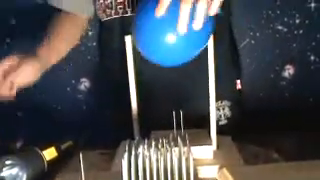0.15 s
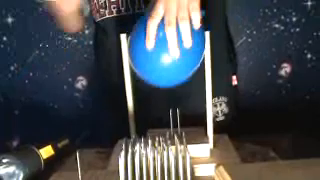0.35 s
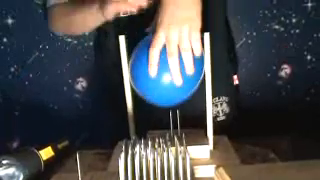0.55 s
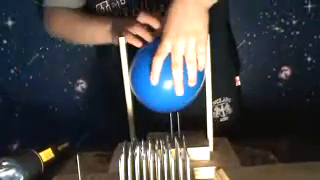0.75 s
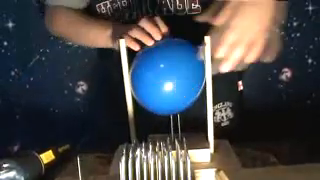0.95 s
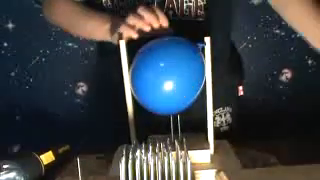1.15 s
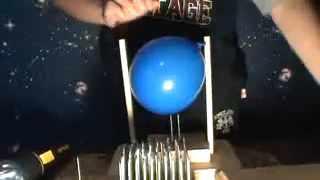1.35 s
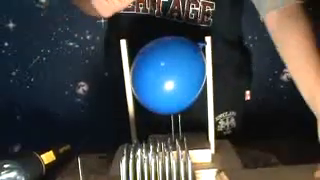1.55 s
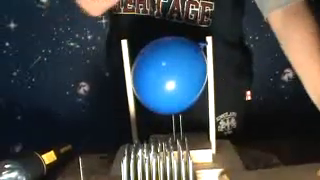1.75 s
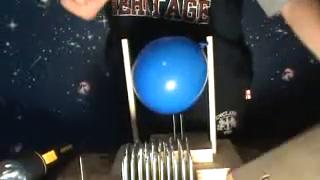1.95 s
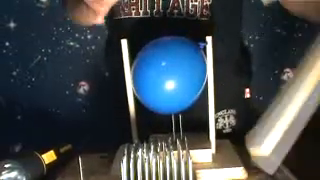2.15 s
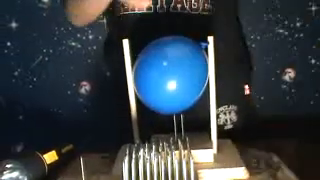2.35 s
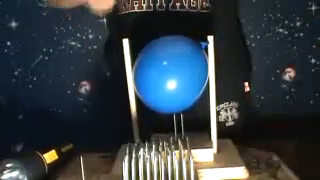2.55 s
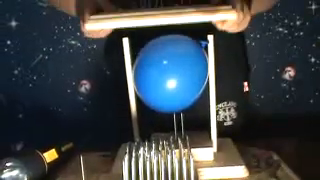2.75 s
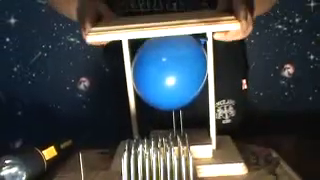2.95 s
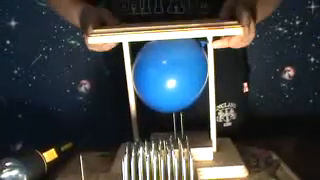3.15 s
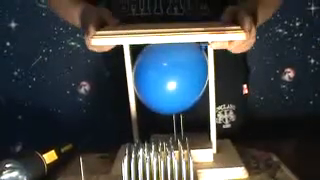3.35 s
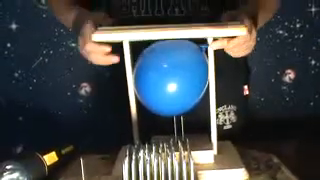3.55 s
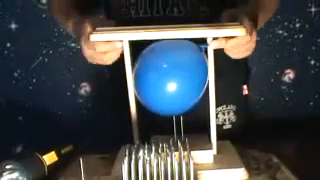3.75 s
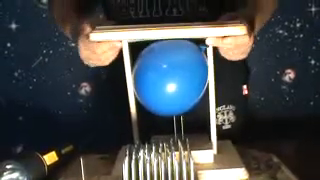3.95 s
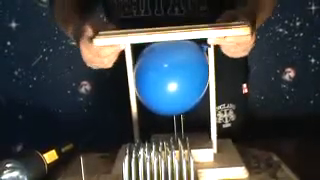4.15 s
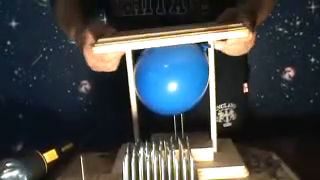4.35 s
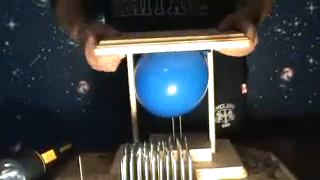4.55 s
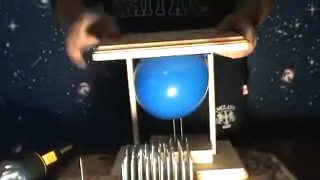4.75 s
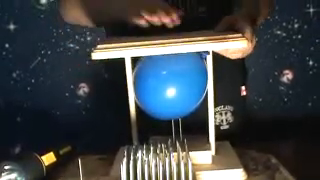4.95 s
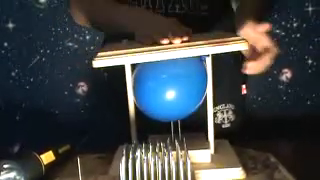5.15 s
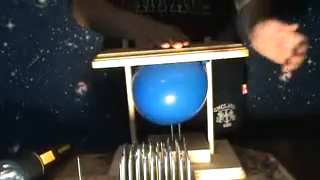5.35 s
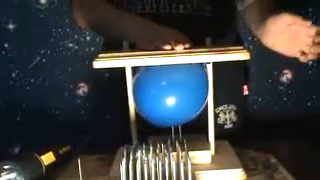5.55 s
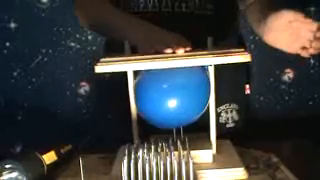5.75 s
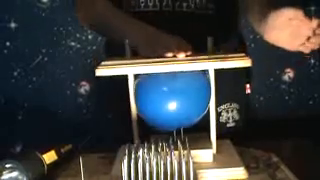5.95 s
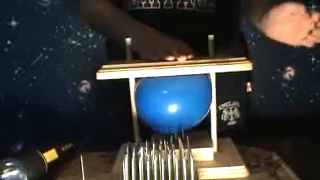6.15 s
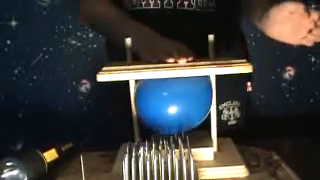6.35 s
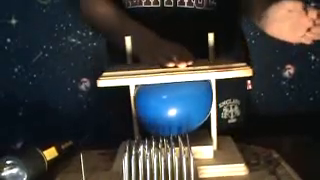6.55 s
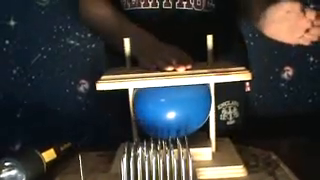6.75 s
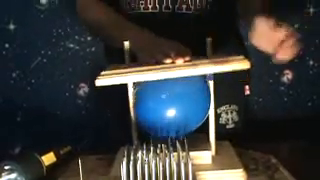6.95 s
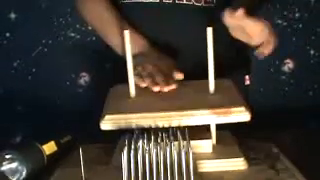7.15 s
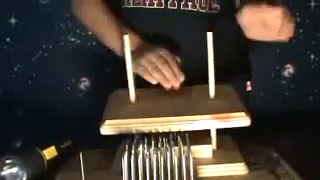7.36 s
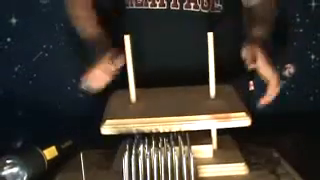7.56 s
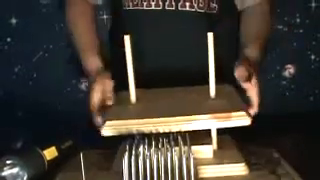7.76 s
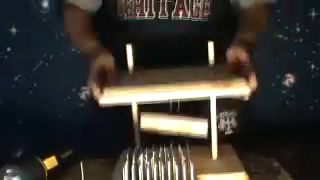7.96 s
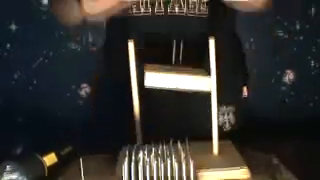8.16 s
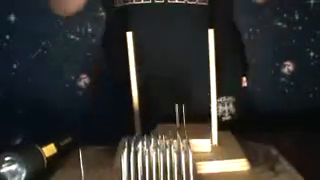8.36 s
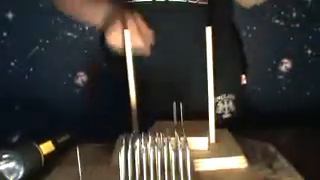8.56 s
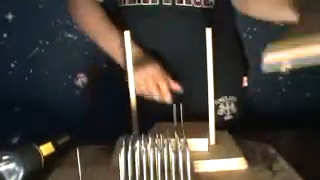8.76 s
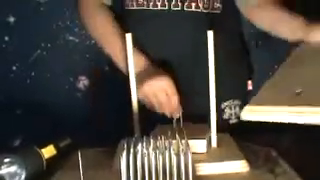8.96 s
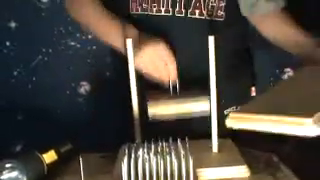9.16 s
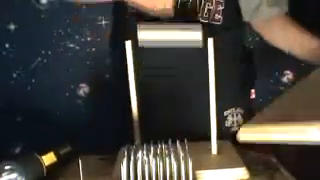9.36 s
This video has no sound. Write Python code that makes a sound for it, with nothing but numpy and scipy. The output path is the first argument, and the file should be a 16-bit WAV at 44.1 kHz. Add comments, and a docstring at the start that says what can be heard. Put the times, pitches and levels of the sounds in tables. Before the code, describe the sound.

Soft rubber rubbing and wooden knocks lead to a loud balloon pop, a heavy thud and a metallic clatter in a small room.

```python
"""In a small, echoing room, a balloon rubs and groans as it is wedged between wooden dowels above a
block of nails. The frame knocks; a board slides down the dowels and nudges the creaking rubber.
After a faint squeak, the board slips in jerks that make the balloon boom. At about 7 seconds the
balloon bursts and the board falls on the base. Lifting the board drags the nail block up until it
drops with a clatter, and two last knocks follow."""
import sys
import numpy as np
from scipy import signal
from scipy.fft import rfft, irfft, next_fast_len
from scipy.io import wavfile
from scipy.ndimage import uniform_filter1d

SR = 44100
rng = np.random.default_rng(int(sys.argv[2]) if len(sys.argv) > 2 else 0)


def digitize_waveform(pressure):
    """Quantize a signal to 16-bit integers and store it at the path in sys.argv[1].

    Rows of a 2-D input are taken as channels; values are limited to [-1, 1].
    """
    field = np.atleast_2d(pressure).T
    bounded = np.clip(field, -1, 1)
    quanta = np.round(bounded * 32767).astype(np.int16)
    wavfile.write(sys.argv[1], SR, quanta)


N = 418509
AGE = np.arange(int(.55 * SR)) / SR  # seconds since a short sound began


def amp(db):
    """Turn decibels into a gain."""
    return 10 ** (np.asarray(db) / 20)


def unit(x):
    """Scale x to an average (rms) level of 1."""
    return x / np.sqrt(np.mean(x ** 2) + 1e-20)


def at_level(x, db):
    """Scale a short sound so its first 40 ms average db."""
    return amp(db) * x / np.sqrt(np.mean(x[..., :int(.04 * SR)] ** 2))


def along(points, hz):
    """Read between the rows of a table of frequencies and values."""
    freqs, values = np.transpose(points)
    return np.interp(np.log(hz + 1), np.log(freqs + 1), values)


def wobble(rate):
    """A random curve that heads for a new value rate times a second."""
    knots = rng.standard_normal(int(N * rate / SR) + 4)
    return np.interp(np.arange(N) * rate / SR, np.arange(len(knots)), knots)


def filtered(x, response):
    """Give each frequency in x the gain response(hz)."""
    n = x.shape[-1]
    padded = next_fast_len(n + 2048, real=True)
    return irfft(rfft(x, padded) * response(np.fft.rfftfreq(padded, 1 / SR)), padded)[..., :n]


def resonance(f, hz, width):
    """A response that favours a band around hz, width Hz wide."""
    return 1j * f * width / (hz * hz - f * f + 1j * f * width)


def add(track, s, sound):
    """Mix a sound into the track at s seconds."""
    part = track[:, round(s * SR):][:, :sound.shape[1]]
    part += sound[:, :part.shape[1]]


def pulse(spectrum):
    """One sharp push of air with the given tone colour."""
    n = 8192
    gains = amp(along(spectrum, np.fft.rfftfreq(n, 1 / SR)))
    cepstrum = irfft(np.log(gains + 1e-5))
    # folding onto the first half packs the energy at the start
    cepstrum[1:n // 2] *= 2
    cepstrum[n // 2 + 1:] = 0
    return np.pad(irfft(np.exp(rfft(cepstrum))), (0, len(AGE) - n))


def ring(modes, attack):
    """A struck object's tones, a bit different each time. A fade time, t60, is seconds to fall 60 dB."""
    scatter_db = rng.normal(0, 2.2, len(modes))
    tones = sum(amp(db + luck - 60 * AGE / t60) * np.sin(2 * np.pi * (hz * AGE + rng.random()))
                for (hz, db, t60), luck in zip(modes, scatter_db))
    return tones * (1 - np.exp(-AGE / attack))


def contact(colour, t60, attack):
    """Rough surfaces meet in a quick cluster of tiny impacts."""
    t = AGE[:SR // 10]
    cluster = rng.standard_normal(len(t)) * amp(-60 * t / t60) * (1 - np.exp(-t / attack))
    sound = signal.fftconvolve(colour[:len(t)], cluster)
    return np.pad(sound, (0, len(AGE) - len(sound)))


def motion(s, length, db, t60, swell_db=0):
    """Loudness of one rub: it gets going, swells to db at its end and dies away."""
    start = int(np.clip(s * SR, 0, N))
    t = np.arange(min(int((length + t60) * SR), N - start)) / SR
    level_db = db - swell_db * np.maximum(1 - t / length, 0) - 60 * np.maximum(t - length, 0) / t60
    onset = 1 - np.exp(-t / (.11 * length))
    return np.pad(amp(level_db) * onset, (start, N - start - len(t)))


# Stereo spread. Each row: frequency in Hz, how alike left and right are (1 is identical).
LIKENESS = [(60, .65), (130, .62), (250, .58), (500, .44), (1000, .38), (2300, .42), (2700, 1)]

def diffuse(count):
    """White noise from all sides, with its treble in the centre."""
    def shares(hz):
        angle = np.arccos(np.clip(along(LIKENESS, hz), 0, 1)) / 2
        return np.array([np.cos(angle), np.sin(angle)])
    mid, side = filtered(rng.standard_normal((2, count)), shares)
    return np.array([mid + side, mid - side])


def noise(spectrum):
    """Stereo noise with the given tone colour."""
    return unit(filtered(diffuse(N), lambda hz: amp(along(spectrum, hz))))


# The room's echo. Each row: frequency in Hz, fade time in seconds.
ROOM_FADE = [(60, 0.34), (200, 0.36), (500, .43), (1500, 0.43), (3500, 0.43), (7500, 0.33), (12000, 0.36)]

def room_tails(count):
    """Echoes from count places in the room; each frequency dies at its own speed."""
    hz, t, bands = signal.stft(np.array([diffuse(len(AGE)) for _ in range(count)]), SR, nperseg=256)
    fade = amp(-60 * t / along(ROOM_FADE, hz)[:, None])
    tails = signal.istft(bands * fade, SR, nperseg=256)[1][..., :len(AGE)]
    return tails / np.linalg.norm(tails[:, :1], axis=2, keepdims=True)


def in_room(x, tail, wet_db):
    """Blend a sound with its echo; a higher wet_db means more echo."""
    echo = signal.fftconvolve(x[None], tail, axes=1)[:, :len(x)]
    return (x + amp(wet_db) * echo) / np.hypot(1, amp(wet_db))


# The background's tone colour. Each row: frequency in Hz, level in dB.
HUSH_COLOUR = [(20, -9.5), (45, 6.5), (130, -1.5), (260, -5), (400, -1), (560, -8), (760, -3.5),
               (1500, -12), (2200, -7.5), (4000, -12), (6000, -15), (7900, -17.5), (9500, -22),
               (15500, -22.5)]

def room_hush():
    """The room hisses quietly all the way through."""
    return amp(-59.4) * noise(HUSH_COLOUR)


# Rubs on the balloon. Each row: start and length in seconds, hollow level and skin level in dB.
RUBS = [(0, .17, -56, -61), (.28, .23, -59, -61), (.6, .19, -49.5, -59.5), (.8, .2, -51, -69),
        (1.1, .18, -55.5, -68), (4.3, .42, -66, -62), (5.29, .06, -58, -62), (6.05, .13, -59, -66),
        (6.69, .13, -59, -64), (7.11, .09, -58, -68)]
# Hands shifting grip. Each row: start and length in seconds, level in dB.
GRIPS = [(1.4, .42, -64), (3.45, .16, -58), (3.87, .83, -56), (4.7, .22, -62), (8.02, .1, -58)]
# Tone colours of the hollow balloon, sliding and hands. Each row: frequency in Hz, level in dB.
HOLLOW_COLOUR = [(40, -14), (80, -2.5), (140, -5.5), (230, -2), (420, -5), (600, -4), (750, -12.5),
                 (1000, -13), (1400, -15), (2300, -24.5), (5000, -52)]
SLIDE_COLOUR = [(900, -34.5), (1200, -5), (1600, -9), (2250, -2), (2700, -7), (3500, -3), (4300, -1.5),
                (5400, -7), (7700, -2), (9300, -14), (12000, -17), (15000, -28)]
HAND_COLOUR = [(29, -37), (50, -13.5), (81, -2.5), (205, -1), (257, -9), (393, -10.5), (443, -18),
               (1200, -18), (1560, -56), (2640, -120)]

def handling():
    """Fingers and wood stick and slip on the hollow balloon; hands shift on the board."""
    t60 = .35
    hollow = sum(motion(s, length, db, t60) for s, length, db, _ in RUBS)
    skin = sum(motion(s, length, db, t60) for s, length, _, db in RUBS)
    grip = sum(motion(s, length, db, t60) for s, length, db in GRIPS)
    stick = unit(amp(2.8 * wobble(45) + 2.5 * wobble(320)))
    return stick * (hollow * noise(HOLLOW_COLOUR) + skin * noise(SLIDE_COLOUR)
                    + grip * noise(HAND_COLOUR))


def thump(hz, thud):
    """One short, low tone of the frame inside a dull thud."""
    tone = unit(ring([(hz, 0, .11)], attack=.0023))
    return tone + amp(-1.5) * unit(contact(thud, t60=.087, attack=.0013))


# Tone colours of a thud, a clack and a tick. Each row: frequency in Hz, level in dB.
THUD_COLOUR = [(30, -32.5), (75, -25), (135, 1.5), (280, 0), (600, -13), (1500, -36), (5000, -59)]
CLACK_COLOUR = [(150, -13), (400, -1.5), (620, -1), (1000, -7.5), (2000, -15.5), (3500, -25), (9000, -63.5)]
TICK_COLOUR = [(500, -29.5), (1500, -4.5), (2000, -0.5), (3100, -2.5), (4300, 0.5), (5500, -9.5),
               (7800, -3), (10000, -14), (15500, -19.5)]
# Knocks. Each row: start in seconds, clack level in dB, thump pitch in Hz, hardness from 0 to 1.
KNOCKS = [(.173, -59, 171, .3), (.347, -46, 245, .25), (.409, -46.5, 252, .26), (.548, -46.5, 255, .35),
          (1.01, -40.5, 524, .45), (1.119, -53, 340, .55), (1.166, -51.5, 203, .35), (1.268, -50, 503, .8),
          (1.616, -62.5, 150, 1), (1.953, -49.5, 471, .66), (7.816, -62, 96, 1), (8.124, -54, 219, .7),
          (8.309, -54, 116, .5), (9.15, -50, 333, .33), (9.231, -43, 219.5, .5)]

def knocks():
    """Wood clacks on the frame; a harder contact has less thump and more tick."""
    out, tails = np.zeros((2, N)), room_tails(count=6)
    thud, clack, tick = pulse(THUD_COLOUR), pulse(CLACK_COLOUR), pulse(TICK_COLOUR)
    for k, (s, db, hz, hardness) in enumerate(KNOCKS):
        sound = at_level(thump(hz, thud), db + 10 - 16 * hardness)
        sound += at_level(contact(clack, t60=.09, attack=.0015), db)
        sound += at_level(contact(tick, t60=.06, attack=.002), db - 17 + 23 * hardness)
        add(out, s, in_room(sound, tails[k % len(tails)], wet_db=-4))
    return out


# The balloon wedging in. Each row: start and length in seconds, final level and swell in dB.
GROANS = [(.65, .12, -54, 0), (.965, .07, -40, 6), (1.14, .14, -61, 3)]

def groans():
    """Quick, uneven slips of the rubber make the air inside the balloon ring."""
    level = sum(motion(s, length, db, t60=.06, swell_db=swell) for s, length, db, swell in GROANS)
    slips_per_second = 140 * amp(3.3 * wobble(90))
    slips_so_far = np.floor(np.cumsum(slips_per_second) / SR)
    jerks = np.diff(slips_so_far, prepend=0) * amp(2.5 * wobble(200))
    air = unit(filtered(jerks, lambda f: resonance(f, hz=640, width=150) ** 2))
    return in_room(level * air, room_tails(count=1)[0], wet_db=-13.5)


# The board nudging balloon and dowels. Each row: start in seconds, level in dB, pitch in Hz.
NUDGES = [(.789, -49, 147), (3.247, -46.5, 220.5), (3.525, -50, 142), (4.015, -48, 88), (4.125, -55, 96),
          (4.236, -48, 88.8), (4.324, -47, 83.4), (4.617, -52, 203), (6.118, -50, 132), (8.004, -53, 140)]

def nudges():
    """Cushioned by the balloon, the board only thumps."""
    out, tails, thud = np.zeros((2, N)), room_tails(count=3), pulse(THUD_COLOUR)
    for k, (s, db, hz) in enumerate(NUDGES):
        add(out, s, in_room(at_level(thump(hz, thud), db), tails[k % len(tails)], wet_db=-3))
    return out


# Wood sliding. Each row: start and length in seconds, then final hiss, final body and hiss swell in dB.
STROKES = [(.975, .03, -53, -47, 0), (1.28, .03, -56, -55, 0), (1.951, .03, -54, -45.5, 0),
           (2.0, .15, -48.5, -67, 2), (2.18, .095, -44.5, -48, 5), (2.57, .057, -47, -51, 2),
           (2.65, .1, -59, -63, 0), (7.085, .1, -52, -52, 5), (8.118, .183, -48.5, -38.5, 7),
           (8.459, .014, -48, -41, 0)]
# Where the dowels ring. Each row: pitch and width in Hz, level in dB.
DOWEL_TONES = [(509, 45, -3.5), (751, 27, -2), (1176, 90, -4.5), (1400, 50, -7), (1867, 68, -10),
               (2287, 85, -4.5), (4200, 190, -9)]

def sliding():
    """Wood grain catches on wood: a rough hiss over the ringing body of the dowels."""
    def dowels(f):
        return sum((-1) ** k * amp(db) * resonance(f, hz, width)
                   for k, (hz, width, db) in enumerate(DOWEL_TONES))
    t60, body_swell_ratio = .2, 1.9
    hiss = sum(motion(s, length, db, t60, swell) for s, length, db, _, swell in STROKES)
    body = sum(motion(s, length, db, t60, body_swell_ratio * swell)
               for s, length, _, db, swell in STROKES)
    catch = unit(amp(1.35 * wobble(60) + 2.1 * wobble(700)))
    return catch * (hiss * noise(SLIDE_COLOUR) + body * unit(filtered(diffuse(N), dowels)))


# Rubber creaks. Each row: start in seconds, level in dB, pitch in Hz.
CREAKS = [(1.85, -58, 1080), (3.146, -58, 2130), (3.997, -58, 2250), (4.03, -59, 2080), (4.118, -58, 1900),
          (4.236, -61, 2000), (4.322, -57.5, 2050), (4.533, -55.5, 2350), (5.264, -58, 2100)]
# Levels in dB of a creak's pitch and its next two multiples.
CREAK_HARMONICS_DB = [-2, 0, -9]

def creaks():
    """The rubber lets go with a tick and a very short, unsteady squeal."""
    out, tails, tick = np.zeros((2, N)), room_tails(count=3), pulse(TICK_COLOUR)
    attack, t60, jitter = .005, .05, .04
    envelope = amp(-60 * AGE / t60) * (1 - np.exp(-AGE / attack))
    for k, (s, db, hz) in enumerate(CREAKS):
        pitch = hz * (1 + jitter * wobble(900)[:len(AGE)])
        phase = 2 * np.pi * np.cumsum(pitch) / SR
        squeal = sum(amp(level) * np.sin(n * phase) for n, level in enumerate(CREAK_HARMONICS_DB, 1))
        sound = unit(envelope * squeal) + unit(contact(tick, t60=.07, attack=.004))
        add(out, s, in_room(at_level(sound, db), tails[k % len(tails)], wet_db=-6))
    return out


# One squeak: start and length in seconds, level in dB, first pitch in Hz, rise in Hz per second.
SQUEAK = (3.665, .135, -69, 4380, 5400)

def squeak():
    """The board sticks and slips on a dowel ever faster, in a thin, unsteady whistle."""
    s, length, db, hz, rise = SQUEAK
    elapsed = np.clip(np.arange(N) / SR - s, 0, 2 * length)
    pitch = (hz + rise * elapsed) * (1 + .01 * wobble(500))
    return motion(s, length, db, t60=.08) * unit(np.sin(2 * np.pi * np.cumsum(pitch) / SR))


# The board's tones. Each row: pitch in Hz, level in dB, fade time in seconds.
BOARD_TONES = [(233, -4.5, 0.15), (280.4, -9.5, 0.19), (337, -12, 0.12), (489, 1.5, 0.061),
               (597, -6, 0.076), (677, -3, 0.08), (746, -5.5, 0.058), (1025, -6, 0.052), (1195, -13, .07),
               (1450, -17, 0.085), (1886, -19, 0.17)]
# Slips. Each row: start in seconds, knock and tick levels in dB, boom pitch in Hz, boom fade in seconds.
SLIPS = [(5.353, -39, -53, 124.4, .2), (5.412, -40.5, -54, 123.7, .25), (5.886, -39.5, -54, 125.3, .43),
         (6.296, -34.3, -53.5, 129.4, .21), (6.6, -35.5, -52.5, 137, .25), (6.68, -36.8, -60, 138, .3)]

def slips():
    """The board jerks down the dowels with a knock, and the squeezed balloon swells into a boom."""
    out = np.zeros((2, N))
    thud, clack, tick = pulse(THUD_COLOUR), pulse(CLACK_COLOUR), pulse(TICK_COLOUR)
    for (s, db, tick_db, hz, t60), tail in zip(SLIPS, room_tails(count=len(SLIPS))):
        knock = unit(ring(BOARD_TONES, attack=.00085))
        knock += amp(-.5) * unit(contact(clack, t60=.057, attack=.0013))
        knock += amp(-5) * unit(contact(thud, t60=.089, attack=.0023))
        sound = at_level(knock, db) + at_level(contact(tick, t60=.08, attack=.0015), tick_db)
        add(out, s, in_room(sound, tail, wet_db=-2.5))
        boom = at_level(ring([(hz, 0, t60)], attack=.032), db - 4.2)
        add(out, s, in_room(boom, tail, wet_db=-10.5))
    return out


# The bang's tone colour. Each row: frequency in Hz, level in dB.
BANG_COLOUR = [(30, -29.5), (120, -12.5), (180, -13.5), (265, -.5), (345, 0), (420, -6.5), (520, -.5),
               (760, -6), (1050, -11), (1800, -12), (2600, -18.5), (7700, -24), (10000, -32.5),
               (15500, -42)]
# One burst: start in seconds, bang and rip levels in dB.
BURST = (7.2432, -2.2, -20)

def burst(tail):
    """The skin rips in an instant and the push of air fills the room."""
    out = np.zeros((2, N))
    s, bang_db, rip_db = BURST
    rip = at_level(contact(pulse(TICK_COLOUR), t60=.022, attack=.02), rip_db)
    add(out, s - .001, in_room(rip, tail, wet_db=-16.5))
    add(out, s, in_room(at_level(pulse(BANG_COLOUR), bang_db), tail, wet_db=26))
    return out


# The blow's tone colour. Each row: frequency in Hz, level in dB.
BLOW_COLOUR = [(25, -25), (60, -13.5), (100, -1), (130, -3), (210, 2.5), (330, -8.5), (640, -18.5),
               (1000, -21), (1300, -15.5), (2200, -37), (8000, -63.5)]
# The base's tones. Each row: pitch in Hz, level in dB, fade time in seconds.
BASE_TONES = [(98.4, -10, 0.2), (138.8, -8.5, .33), (182.5, -1.5, 0.38), (210.3, -4, 0.27),
              (269.5, -8, 0.27), (371, -19, .36), (450, -21.5, 0.43), (491, -19, 0.4), (623, -21.5, .28),
              (759, -19.5, 0.37)]
# One fall: start in seconds, then blow, ring and tick levels in dB.
FALL = (7.373, -14.5, -16, -37.5)

def board_fall(tail):
    """The freed board hits the base with a tick and a heavy blow, and the base rings."""
    out = np.zeros((2, N))
    s, blow_db, ring_db, tick_db = FALL
    blow = at_level(pulse(BLOW_COLOUR), blow_db)
    base = at_level(ring(BASE_TONES, attack=.0069), ring_db)
    tick = at_level(contact(pulse(TICK_COLOUR), t60=.025, attack=.001), tick_db)
    add(out, s - .003, in_room(tick, tail, wet_db=-17.5))
    add(out, s, in_room(base, tail, wet_db=-11.5))
    add(out, s + .00304, in_room(blow, tail, wet_db=-1))
    return out


# The clatter's tone colour. Each row: frequency in Hz, level in dB.
CLATTER_COLOUR = [(40, -28), (130, -17), (230, -12), (300, -0.5), (430, -4.5), (610, 0.5), (900, -4),
                  (1200, -1), (1600, -5), (2160, -3.5), (3200, -5.5), (4400, -8.5), (6000, -22.5),
                  (7600, -19), (11500, -43), (15500, -57.5)]
# The nails' tones. Each row: pitch in Hz, level in dB, fade time in seconds.
NAIL_TONES = [(771, -5.5, .3), (1027, -6, .26), (1717, -1, .26), (1864, -1.5, .26), (2066, 2, .25),
              (2170, -2, .25), (2590, -1, .26), (2659, -2.5, .25), (3175, 5.5, .25), (3260, 0.5, .24),
              (3317, -3, .24), (3413, 2, .24), (3900, -5, .25), (4050, -9, .25), (4300, -11, .24),
              (5652, -8, .18)]
# The block's landings. Each row: start in seconds, then clatter, thud and click levels in dB.
LANDINGS = [(8.5179, -19.5, -41, -29.5), (8.527, -13, -43, -39), (8.548, -21.5, -43, -47),
            (8.572, -19, -29, -57.5)]

def nail_block():
    """The block lands edge first and bounces; its nails ring and the base thuds."""
    out = np.zeros((2, N))
    clatter, thud, tick = pulse(CLATTER_COLOUR), pulse(THUD_COLOUR), pulse(TICK_COLOUR)
    for (s, db, thud_db, click_db), tail in zip(LANDINGS, room_tails(count=len(LANDINGS))):
        add(out, s, in_room(at_level(clatter, db) + at_level(thud, thud_db), tail, wet_db=20))
        nails = at_level(ring(NAIL_TONES, attack=.00055), db - 8)
        click = at_level(contact(tick, t60=.046, attack=.002), click_db)
        add(out, s, in_room(nails + click, tail, wet_db=-11))
    return out


def scene():
    """All the sounds over the quiet hiss of the room."""
    build_up = knocks() + nudges() + creaks() + sliding() + handling() + groans() + squeak() + slips()
    burst_tail, fall_tail = room_tails(count=2)
    return build_up + burst(burst_tail) + board_fall(fall_tail) + nail_block() + room_hush()


def limiter(x, ceiling_db, release_db_per_s):
    """Turn the sound down at once when it passes the ceiling, then let it come back."""
    power = np.abs(uniform_filter1d(np.mean(x ** 2, axis=0), size=180))
    excess_db = np.maximum(10 * np.log10(power + 1e-12) - ceiling_db, 0)
    ramp = release_db_per_s * np.arange(N) / SR
    cut_db = np.maximum.accumulate(excess_db + ramp) - ramp
    return x * amp(-uniform_filter1d(cut_db, size=40))


def record(dry):
    """Hold the bangs down, round their peaks and cut the highest treble."""
    held = limiter(dry, ceiling_db=-10.2, release_db_per_s=111)
    rounded = held / (1 + (held / .8) ** 4) ** .25
    return filtered(rounded, lambda hz: hz < 15850)


dry = scene()
out = record(dry)
digitize_waveform(out)
```